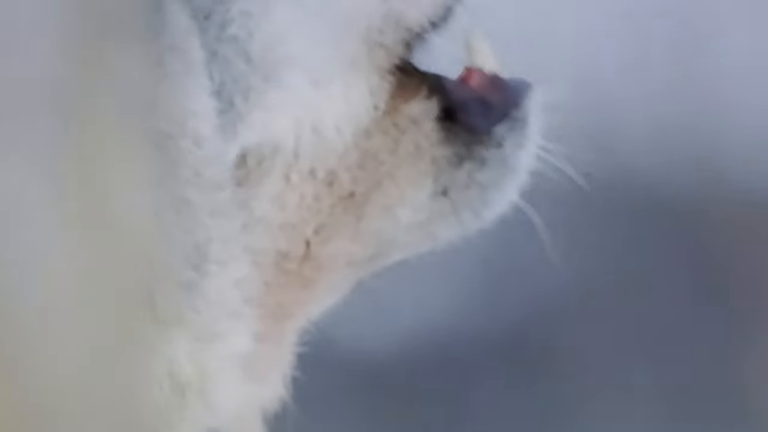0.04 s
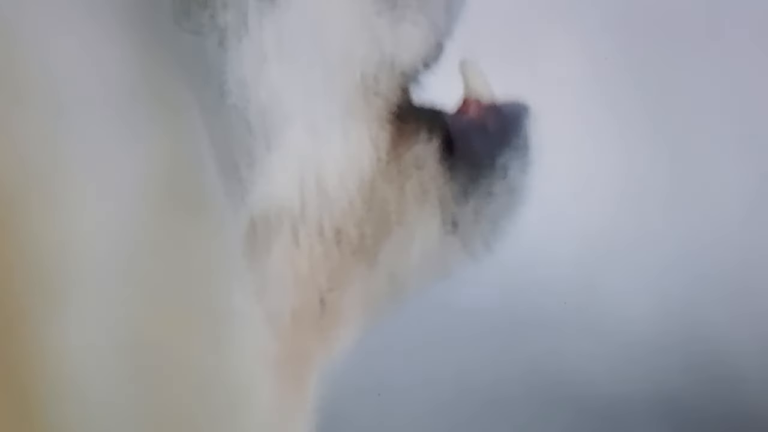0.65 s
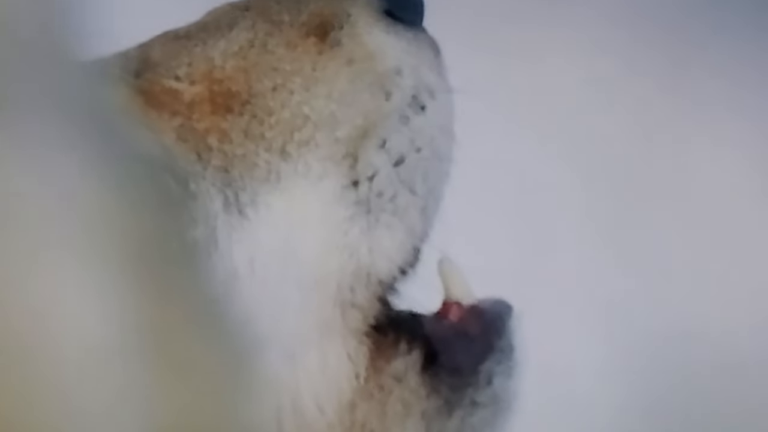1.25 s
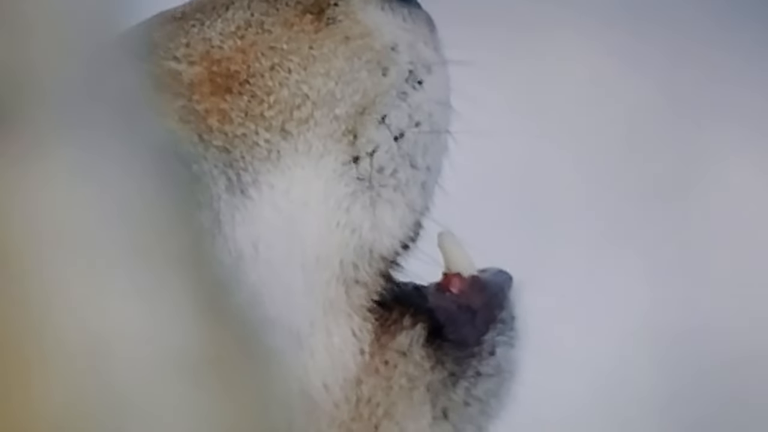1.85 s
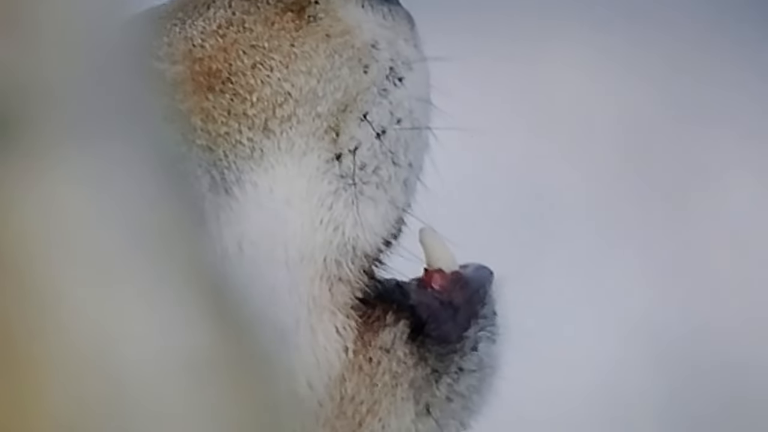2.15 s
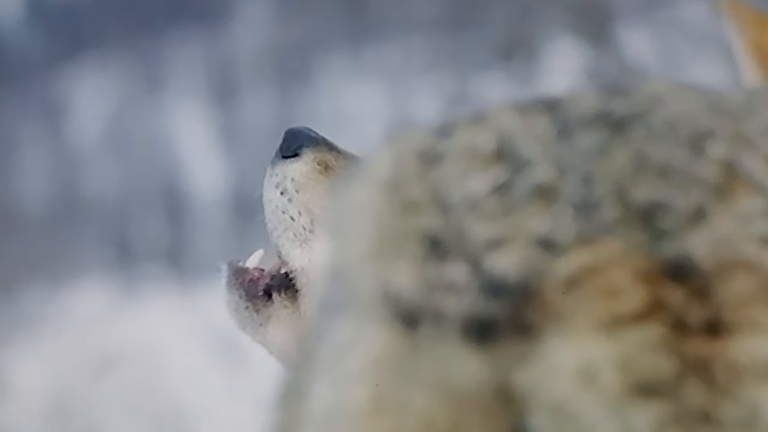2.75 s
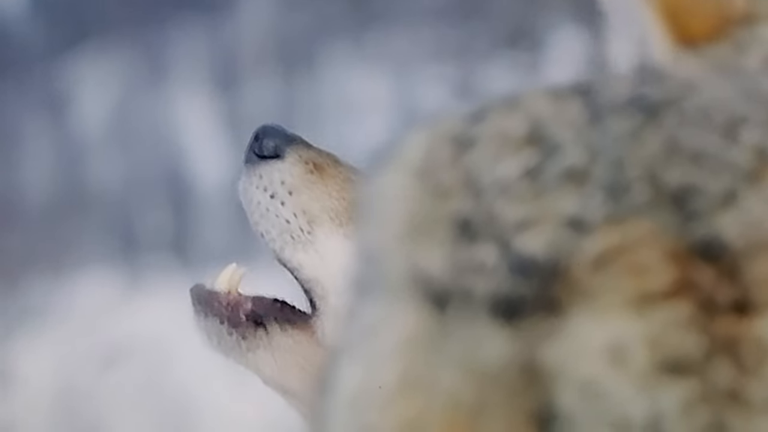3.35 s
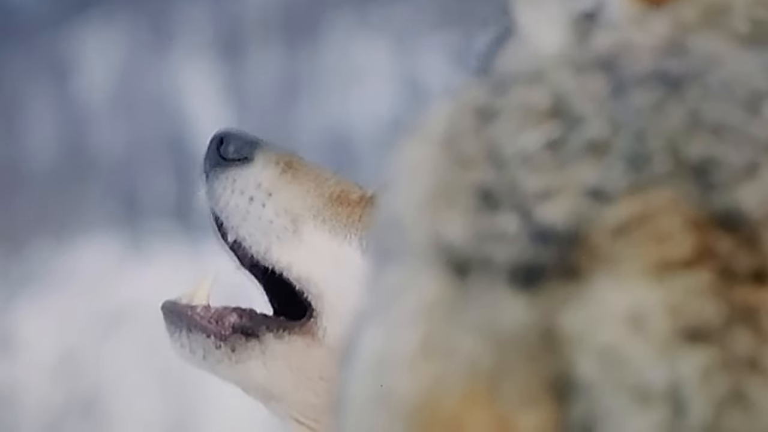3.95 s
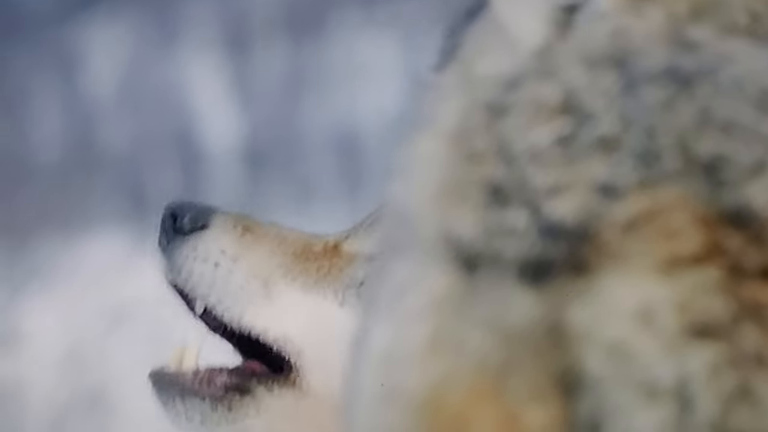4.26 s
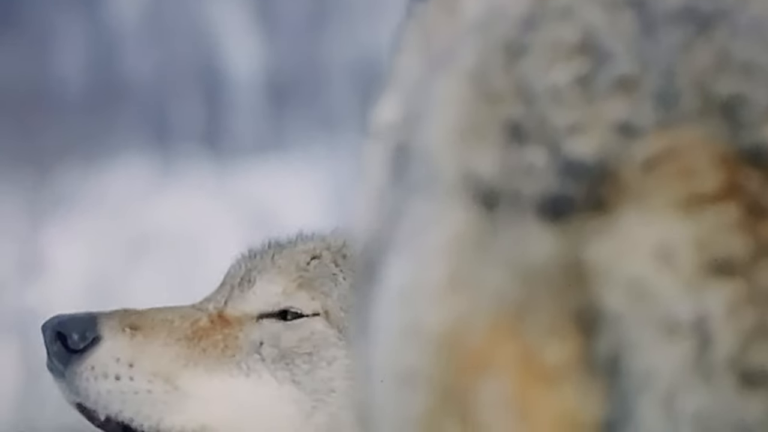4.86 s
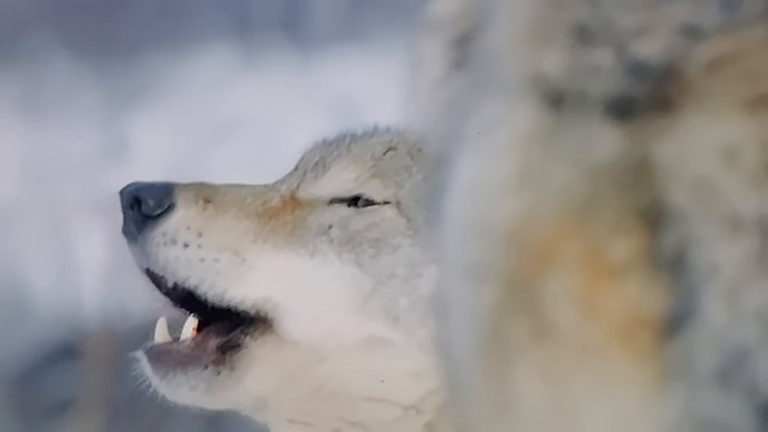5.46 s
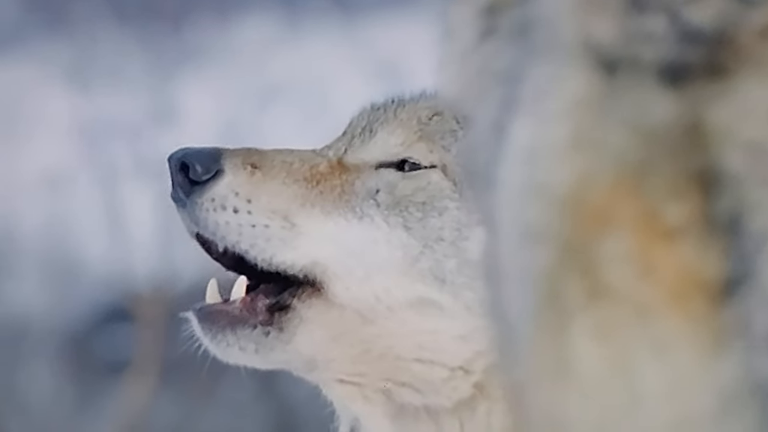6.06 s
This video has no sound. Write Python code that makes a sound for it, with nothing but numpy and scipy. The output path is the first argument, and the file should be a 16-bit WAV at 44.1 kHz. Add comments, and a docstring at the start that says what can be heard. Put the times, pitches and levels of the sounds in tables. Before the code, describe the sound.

A wolf opens with a high howl that slides downward, and the nearest wolf joins on a long, pure, lower note. Midway the high howl breaks down to the same pitch and pulses against it before fading. The near howl lifts and grows louder as another wavers above. Distant yips and whines dot the background. The microphone is near the lead wolf, in quiet woods with soft echo and faint hiss.

```python
"""Wolves howling in snowy woods

The nearest wolf holds one long, pure note. A high howl slides down, breaks to the nearest wolf's pitch and
beats with it; two more howl farther off while others yip and whine behind them, and the near wolves add a
whimper and a few short cries. Each howl is a few harmonics gliding through fixed resonances; each yip, whine or
cry is a single sliding partial. The trees return a soft echo over faint hiss and a low rumble that swells near
the end."""
import sys
import numpy as np
from scipy import signal
from scipy.fft import rfft, irfft, next_fast_len
from scipy.io import wavfile
from scipy.ndimage import uniform_filter1d

SR = 44100
rng = np.random.default_rng(int(sys.argv[2]) if len(sys.argv) > 2 else 0)


def output_pcm(signal):
    """Save a mono or channel-first signal as 16-bit PCM at the path in sys.argv[1].

    Samples are clipped to [-1, 1] before scaling.
    """
    pcm = np.clip(np.atleast_2d(signal).T, -1, 1) * 32767
    wavfile.write(sys.argv[1], SR, np.round(pcm).astype(np.int16))


N = 273861
TIME = np.arange(N) / SR

# tone of the air and hiss: frequency_hz, relative_db
AIR_SPECTRUM = [(20, -6.5), (90, -6), (190, -2), (330, 1.5), (1220, -4), (1500, -13), (2400, -25.5),
                (4000, -27.5), (6600, -22), (7400, -38.5), (9500, -32.5), (15500, -27.5)]
# brief rises and dips in the hiss: start_s, length_s, gain_db
AIR_SWELLS = [(.48, 0.16, 3.5), (1.05, 0.35, -0.5)]
# the rumble's two resonances: time_s, lower_pitch_hz, lower_level_db, upper_level_db
RUMBLE_PATH = [(0, 63.6, -72.5, -78.5), (3.6, 62.85, -68, -70.5), (3.85, 66.7, -59.5, -64.5),
               (4.3, 68.06, -66.5, -69), (5.5, 73, -58.5, -58), (5.8, 76, -46.5, -51.5),
               (6.2, 73.6, -59.5, -55.5)]
# decay of the echo among the trees: frequency_hz, t60_s
WOODS_DECAY = [(400, 0.87), (3000, 0.36)]
# range of the far whines and their strength along it: pitch_hz, relative_db
WHINE_RANGE = [(520, -8), (800, -1.5), (1150, -0.5), (1330, -8)]
# yips, each one strong partial: start_s, length_s, first_hz, middle_hz, last_hz, level_db
YIP_CALLS = [(0.299, .2, 985, 1051, 1116, -53.5), (0.319, 0.24, 387.5, 408.7, 433, -55.5),
             (0.447, 0.4, 1256, 1302, 1377, -50), (1.027, 0.16, 1083, 1040, 994, -45),
             (1.806, 0.37, 985, 1047, 997, -57.5), (2.159, 0.19, 900, 1000, 1135, -62),
             (2.388, 0.14, 1206, 1231, 1220, -54.5), (2.9, .1, 1270, 1215, 1198, -41),
             (3.207, 0.17, 1037, 998, 938, -46.5), (3.611, 0.11, 698, 734, 817, -44.5),
             (3.878, 0.092, 944, 1067, 1160, -51.5), (4.261, 0.16, 1315, 1161, 1025, -53),
             (5.191, .19, 822, 622, 597, -47), (5.261, 0.092, 720, 713.5, 726, -35.5),
             (5.271, 0.13, 1869, 1740, 1653, -62.5), (5.309, 0.12, 1185, 1028, 897, -50.5),
             (5.474, 0.14, 981, 1050, 1130, -49.5), (5.689, 0.05, 1105, 1110, 1064, -37.5),
             (6.04, 0.13, 1820, 1756, 1639, -59)]

# melody of each howl (HIGH breaks into SINKING, one wolf): time_s, pitch_hz, effort_db
FAR_MELODY = [(0, 555.5, -73), (1.0, 538.4, -56), (2.1, 560, -69.5), (2.85, 570.4, -53),
              (3.6, 538.6, -54.5), (4.3, 504.2, -48.5), (4.98, 476, -58.5)]
WAVERING_MELODY = [(3.2, 599, -38.5), (3.33, 576, -35), (3.99, 925.2, -41), (4.87, 609, -34),
                   (5.25, 716.6, -34), (5.95, 503.5, -35), (6.21, 518, -33.5)]
HIGH_MELODY = [(-.15, 602, -48.5), (.11, 696, -43.5), (.28, 692, -50.5), (.58, 705.6, -40),
               (1.36, 559.6, -35.5), (2.22, 561.1, -34.5), (2.8, 509, -46.5)]
SINKING_MELODY = [(2.66, 513.3, -54.5), (2.84, 485, -52), (2.93, 398, -34), (3.1, 393, -39),
                  (3.35, 384.1, -39), (3.6, 377, -47.5), (4.0, 367.7, -51), (4.35, 340.4, -62.5)]
LEAD_MELODY = [(0.62, 436.4, -50.5), (0.7, 469.5, -46), (0.77, 439.7, -36), (0.82, 423.6, -39),
               (0.9, 462.6, -39.5), (0.99, 435.5, -34), (1.04, 424.3, -41.5), (1.3, 389.4, -33.5),
               (1.45, 384.6, -35), (1.72, 379.6, -39), (2.16, 384.2, -34), (3.48, 389, -31.5),
               (3.64, 406.3, -30.5), (3.7, 418.2, -37), (3.83, 441.3, -28), (3.95, 451.2, -32.5),
               (4.51, 456.0, -32), (4.99, 437.3, -27), (5.23, 437.5, -30.5), (5.6, 438.1, -26.5),
               (6.21, 441.3, -27.5)]
# each howl's colour, from the throat and the path to the listener: frequency_hz, gain_db
FAR_TONE = [(480, -11), (540, -13.5), (570, -1.5), (950, 1.5), (1140, 1.5)]
WAVERING_TONE = [(510, -26.5), (600, -12.5), (715, 0), (830, -8), (1010, -9.5), (1090, -12.5),
                 (1160, -22.5), (1260, -28.5), (1450, -39.5), (1850, -40.5)]
HIGH_TONE = [(510, -8), (565, -1), (590, 1.5), (640, -6), (700, 0.5), (1030, -3), (1125, -5), (1170, -20),
             (1245, 9.5), (1310, -8), (1410, -8.5)]
SINKING_TONE = [(520, 1.5), (790, -20.5), (1000, -7), (1100, -9), (1190, -12.5), (1420, -1.5), (1540, -25)]
LEAD_TONE = [(470, 1.5), (760, -22.5), (900, -35), (1150, -37), (1250, -22), (1320, -35), (1390, -30.5)]
# throat colour of the upper harmonics, shared by all howls: frequency_hz, gain_db
UPPER_TONE = [(1500, -28.5), (1720, -32.5), (1950, -25), (2200, -46), (3500, -61.5)]
# single harmonics that ring out as the mouth moves: start_s, length_s, harmonic_number, level_db
WAVERING_OVERTONES = [(4.66, 0.38, 2, -43.5), (5.46, 0.24, 2, -43.5)]
HIGH_OVERTONES = [(-.25, 1, 3, -75), (-.2, 1, 4, -84.5), (1.05, .2, 3, -70), (1.55, 0.77, 11, -78),
                  (1.75, .65, 5, -81)]
SINKING_OVERTONES = [(2.8, 1.3, 4, -67)]
LEAD_OVERTONES = [(1.0, 0.3, 2, -42.5), (1.5, .6, 5, -77), (3.2, 0.55, 5, -73.5), (3.85, 1.16, 2, -46.5),
                  (5.75, 0.4, 2, -53.5), (3.85, 0.63, 12, -77), (4.68, 0.44, 10, -77),
                  (5.88, 0.36, 10, -79)]
# brief dips and swells in a howl's loudness: start_s, length_s, gain_db
WAVERING_DIPS_AND_SWELLS = [(3.38, 0.12, -4.5), (3.52, .09, 2), (3.66, .24, -12), (4.02, 0.2, -9),
                            (4.36, .08, -5.5), (4.9, .12, -12), (5.15, .12, -14), (5.37, 0.068, -1)]
HIGH_DIPS_AND_SWELLS = [(.2, 0.061, -8.5), (.5, 0.058, -7.5), (1.1, .12, 6)]


def gain_of(db):
    """Decibels to amplitude."""
    return 10 ** (np.asarray(db) / 20)


def unit_rms(x):
    """Scales to rms 1."""
    return x / np.sqrt(np.mean(x ** 2) + 1e-20)


def value_at(points, hz):
    """Reads a curve on a log-frequency axis."""
    f, value = np.transpose(points)
    return np.interp(np.log(hz + 1), np.log(f), value)


def curves(rows, eased=False):
    """Each column as an envelope over time; eased ones slow down around each row."""
    times, *columns = np.transpose(rows)
    index = np.arange(len(times))
    place = np.interp(TIME, times, index)
    if eased:
        place = np.floor(place) + np.sin(np.pi / 2 * (place % 1)) ** 2
    return [np.interp(place, index, column) for column in columns]


def arch(start, length):
    """A smooth swell from nothing to one and back."""
    return np.sin(np.pi * np.clip((TIME - start) / length, 0, 1))


def drift(rate_hz):
    """Smooth random modulation of rms 1, up to about the given rate."""
    size = next_fast_len(N)
    hz = np.fft.rfftfreq(size, 1 / SR)
    spectrum = rfft(rng.standard_normal(size)) / (1 + (hz / rate_hz) ** 2)
    return unit_rms(irfft(spectrum, size)[:N])


def pan(left_db):
    """Constant-power stereo gains, the left louder than the right by left_db."""
    return unit_rms(gain_of(np.array([[left_db], [-left_db]]) / 2))


def with_send(voice, echo_db):
    """Pairs a direct voice with its send into the woods."""
    return np.array([voice, gain_of(echo_db) * voice])


def air(level_db, left_db, patchy_db):
    """A bed of outdoor wash and hiss, wide above the bass, that comes up in about the first second."""
    frames, hz = N // 256 + 5, np.fft.rfftfreq(1024, 1 / SR)
    a, b, c, d, patches = rng.standard_normal((5, frames, len(hz))).transpose(0, 2, 1)
    patches = unit_rms(uniform_filter1d(uniform_filter1d(patches, 5, 0), 18, 1))
    coherence = 1 / (1 + (hz[:, None] / 450) ** 2)
    left = a + 1j * b
    right = coherence * left + np.sqrt(1 - coherence ** 2) * (c + 1j * d)
    spectra = np.array([left, right]) * gain_of(value_at(AIR_SPECTRUM, hz)[:, None] + patchy_db * patches)
    wash = unit_rms(signal.istft(spectra, nperseg=1024, noverlap=768)[1][:, :N])
    swell_db = np.interp(TIME, [.3, 1.1], [-5, 0])
    swell_db += sum(db * arch(start, length) for start, length, db in AIR_SWELLS)
    return gain_of(level_db + swell_db) * pan(left_db) * wash


def rumble(width_hz, upper_hz, upper_width_hz, left_db):
    """Two narrow, fuzzy bass resonances, perhaps a distant engine."""
    hz, low_db, upper_db = curves(RUMBLE_PATH)
    low = (drift(width_hz) + 1j * drift(width_hz)) * np.exp(2j * np.pi * np.cumsum(hz) / SR)
    upper = (drift(upper_width_hz) + 1j * drift(upper_width_hz)) * np.exp(2j * np.pi * upper_hz * TIME)
    return pan(left_db) * (gain_of(low_db) * low + gain_of(upper_db) * upper).real


def woods_echo(send):
    """Scattered returns from the trunks, different on each side; treble dies first."""
    taps = rng.standard_normal((2, SR)) * (rng.random((2, SR)) < 1500 / SR)  # about 1500 a second
    taps *= TIME[:SR] > .012  # pre-delay
    hz, age_s, spectra = signal.stft(taps, SR, nperseg=256)
    decay = gain_of(-60 * age_s / value_at(WOODS_DECAY, hz)[:, None])
    tail = signal.istft(spectra * decay, SR, nperseg=256)[1]
    tail /= np.linalg.norm(tail, axis=1, keepdims=True)
    return signal.fftconvolve(send, tail, axes=1)[:, :N]


def far_whines(per_s, usual_length_s, max_glide_octaves, level_db, left_db, jitter, echo_db):
    """Faint whines from deep in the woods, each sliding up or down at random."""
    whines, tremor = np.zeros(N), jitter * drift(30)
    lowest_hz, highest_hz = WHINE_RANGE[0][0], WHINE_RANGE[-1][0]
    for when, span, height, slope in rng.random((round(per_s * N / SR), 4)):
        start, length = when * N / SR, usual_length_s * (.5 + span)
        on = (TIME >= start) & (TIME < start + length)
        progress = (TIME[on] - start) / length
        middle_hz = lowest_hz * (highest_hz / lowest_hz) ** height
        hz = middle_hz * 2 ** (max_glide_octaves * (2 * slope - 1) * (progress - .5))
        swell = gain_of(value_at(WHINE_RANGE, hz)) * np.sin(np.pi * progress)
        whines[on] += swell * np.sin(2 * np.pi * (np.cumsum(hz) / SR + tremor[on]))
    return with_send(gain_of(level_db) * pan(left_db) * unit_rms(whines), echo_db)


def yips(left_db, jitter, echo_db):
    """Short, unsteady glides: yips and whines from the back of the pack, plus a whimper from the nearest wolf
    and short cries from the wavering one; a quick attack, a slower release."""
    calls, tremor = np.zeros(N), jitter * drift(30)
    for start, length, first_hz, middle_hz, last_hz, db in YIP_CALLS:
        on = (TIME >= start) & (TIME < start + length)
        progress = (TIME[on] - start) / length
        glide = np.polyfit([0, .5, 1], [first_hz, middle_hz, last_hz], 2)
        hz = np.polyval(glide, progress)
        swell = gain_of(db) * np.sqrt(2) * np.sin(np.pi * progress ** .65)
        calls[on] += swell * np.sin(2 * np.pi * (np.cumsum(hz) / SR + tremor[on]))
    return with_send(pan(left_db) * calls, echo_db)


def howl(melody, tone, overtones=(), swells=(), *, left_db, overtone_left_db, right_lag_ms, bright_db,
         jitter, echo_db, wander=0, shimmer_db=.5, flutter_db=1.26, own_harmonics=2, eased=False):
    """One howl: clean harmonics swell as they glide through resonances, the lowest through its own."""
    hz, effort_db = curves(melody, eased)
    hz *= 1 + wander * drift(4)  # the pitch strays a little from its course
    level_db = effort_db + sum(db * arch(onset, length) for onset, length, db in swells)
    start, end = melody[0][0], melody[-1][0]
    fade = np.clip((TIME - start) / .0067, 0, 1) * np.clip((end - TIME) / .05 + 1, 0, 1)
    cycles = np.cumsum(hz * (TIME >= start)) / SR
    cycles += jitter * drift(15)  # the vocal folds never run quite evenly
    cycles = np.array([cycles, cycles - hz * right_lag_ms / 1000])
    partials = []
    for k in range(1, 7):
        if k <= own_harmonics:
            colour_db = value_at(tone, k * hz)
        else:
            colour_db = bright_db + value_at(UPPER_TONE, k * hz)
        partials.append((k, gain_of(level_db + colour_db)))
    partials += [(round(k), gain_of(db) * arch(onset, length)) for onset, length, k, db in overtones]
    voice = np.zeros((2, N))
    for k, envelope in partials:
        flutter = gain_of(flutter_db * np.sqrt(k - 1) * drift(10))  # higher harmonics are less steady
        sides = pan(overtone_left_db if k > 1 else left_db)
        voice += sides * envelope * flutter * np.sin(2 * np.pi * k * cycles)
    voice *= np.sqrt(2) * fade * gain_of(shimmer_db * drift(4.6))
    return with_send(voice, echo_db)


def scene():
    """Mixes the pack and its echo over the bed of air and rumble."""
    lead = howl(LEAD_MELODY, LEAD_TONE, LEAD_OVERTONES, own_harmonics=3, bright_db=-23.5, jitter=.018,
                left_db=4.5, overtone_left_db=13, right_lag_ms=.022, echo_db=-23.5)
    sinking = howl(SINKING_MELODY, SINKING_TONE, SINKING_OVERTONES,
                   own_harmonics=3, bright_db=-15, jitter=.011,
                   left_db=2.5, overtone_left_db=12, right_lag_ms=.026, echo_db=-11.5)
    high = howl(HIGH_MELODY, HIGH_TONE, HIGH_OVERTONES, HIGH_DIPS_AND_SWELLS,
                eased=True, bright_db=-14.5, jitter=.013, flutter_db=.8,
                left_db=-4, overtone_left_db=13, right_lag_ms=-.53, echo_db=-16)
    far = howl(FAR_MELODY, FAR_TONE, bright_db=-15.5, jitter=.045,
               left_db=2, overtone_left_db=5.5, right_lag_ms=-.28, echo_db=-7)
    wavering = howl(WAVERING_MELODY, WAVERING_TONE, WAVERING_OVERTONES, WAVERING_DIPS_AND_SWELLS,
                    eased=True, bright_db=-13, jitter=.013, wander=.009, shimmer_db=3.5, flutter_db=.9,
                    left_db=2.5, overtone_left_db=6, right_lag_ms=-.22, echo_db=-9.5)
    yipping = yips(left_db=6, jitter=.041, echo_db=-5)
    whining = far_whines(per_s=10, usual_length_s=.24, max_glide_octaves=.3,
                         level_db=-62, left_db=2, jitter=.03, echo_db=0)
    direct, send = lead + sinking + high + far + wavering + yipping + whining
    hiss = air(level_db=-57, left_db=6, patchy_db=1.94)
    echo = woods_echo(send)
    bass = rumble(width_hz=4.3, upper_hz=114.8, upper_width_hz=16, left_db=2.5)
    return direct + echo + hiss + bass


def record(dry):
    """A steep low-pass trims the hiss above 15.8 kHz."""
    lowpass = signal.firwin(511, 15800, window=("kaiser", 9), fs=SR)
    return signal.oaconvolve(dry, lowpass[None], "same")


dry = scene()
out = record(dry)
output_pcm(out)
```